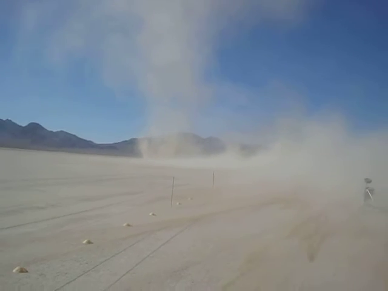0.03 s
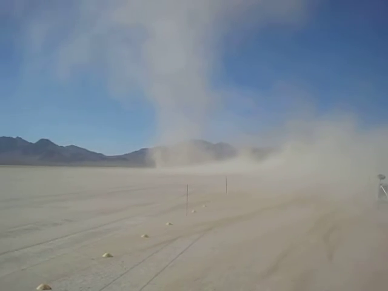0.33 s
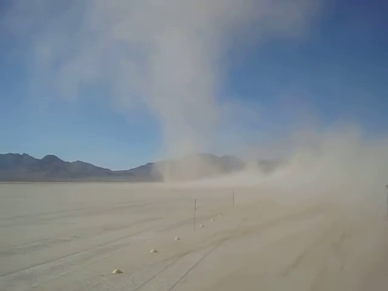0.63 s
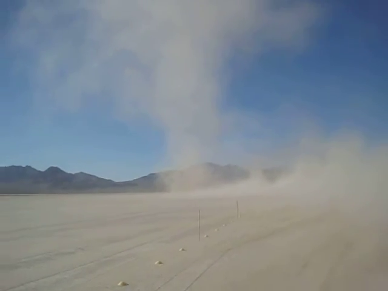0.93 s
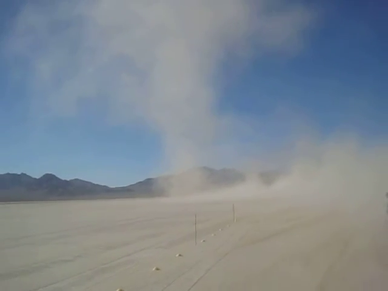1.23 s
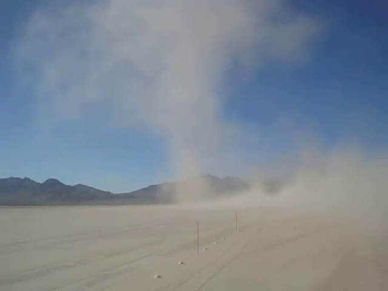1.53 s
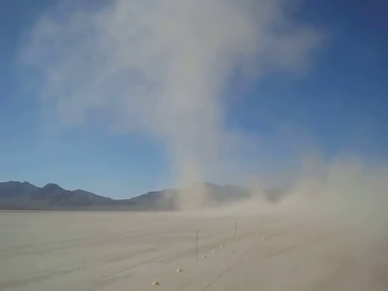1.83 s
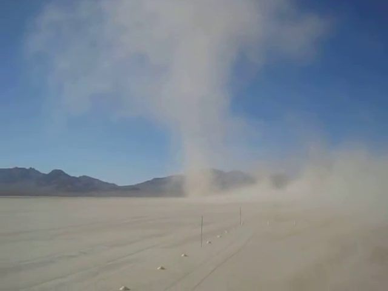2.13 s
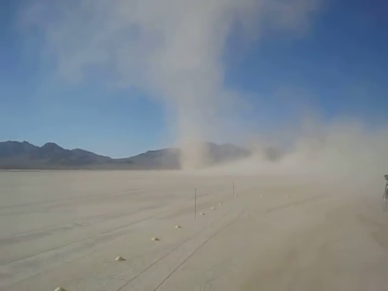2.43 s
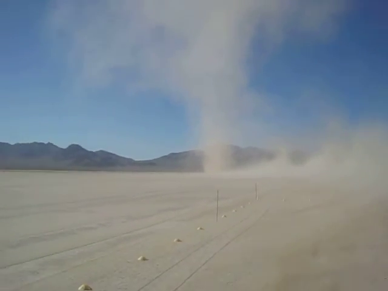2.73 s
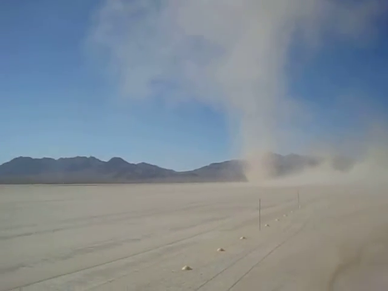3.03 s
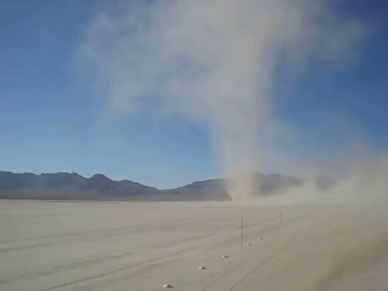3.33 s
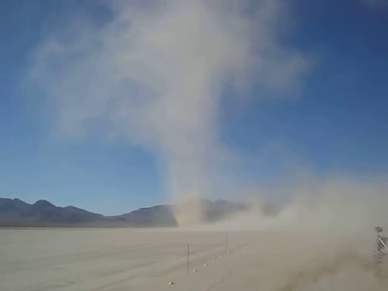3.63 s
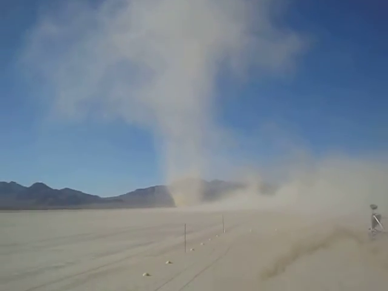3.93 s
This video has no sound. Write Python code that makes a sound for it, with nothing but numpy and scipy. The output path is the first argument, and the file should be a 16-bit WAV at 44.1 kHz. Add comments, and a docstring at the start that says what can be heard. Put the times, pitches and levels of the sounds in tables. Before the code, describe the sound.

Gusting wind buffets the microphone with rumbling thumps and a hiss of blown sand.

```python
"""A dry lake bed in gusting wind, a small bare microphone standing in the open as a dust devil passes.
Eddies flap and thump right on the diaphragm, over a roar and a rumble. Blown sand hisses across the
ground and peppers the microphone, swelling and then dying away. The hardest gusts make the diaphragm
crackle and pin it, choking the sound for milliseconds; in the lull a speck of grit ticks on the case."""
import sys
import numpy as np
from scipy import signal
from scipy.fft import rfft, irfft
from scipy.io import wavfile
from scipy.ndimage import uniform_filter1d

SR = 44100
rng = np.random.default_rng(int(sys.argv[2]) if len(sys.argv) > 2 else 0)


def store_pcm(level_fs):
    """Save levels as 16-bit WAV."""
    pcm = np.round(np.clip(level_fs, -1, 1) * 32767).astype(np.int16)
    wavfile.write(sys.argv[1], SR, np.atleast_2d(pcm).T)


N = 176400

# strength of the gusts, heard as the low rumble (t/s, relative level/dB)
GUST_LEVEL = [(0.0, -32.5), (0.4, -29), (0.71, -33), (1.05, -29.5), (1.4, -32.5), (2.25, -30.5),
              (2.54, -29.5), (2.8, -25.5), (3.21, -27.5), (3.38, -36.5), (3.55, -39), (4.0, -32.5)]
# strength of the turbulence at the microphone (t/s, relative level/dB)
TURBULENCE_LEVEL = [(0.08, -36), (0.3, -30.5), (0.7, -31), (1.05, -29.5), (1.35, -32), (1.6, -30),
                    (1.75, -27.5), (2.2, -28.5), (2.52, -32), (2.7, -23.5), (3.0, -28), (3.33, -34.5),
                    (3.43, -59), (3.52, -38.5), (3.62, -41), (4.0, -38)]
# strength of the blown sand (t/s, relative level/dB)
SAND_LEVEL = [(0.08, -57), (0.25, -54), (0.7, -53.5), (1.1, -52), (1.55, -51), (1.9, -48.5), (2.18, -50),
              (2.3, -46), (2.42, -51), (2.75, -48), (2.95, -52.5), (3.13, -64), (3.22, -59.5),
              (3.45, -74.5), (3.67, -72), (3.89, -60), (4.0, -74)]


def buffets(gain_db=-2.5, top_hz=2450, spiky=0.72, steep=2.26, rise=0.76, size=4096):
    """Eddies flap at the microphone in ragged, fast-rising bursts, each of its own length and pitch."""
    # passing eddies (centre t/s, width/s, relative level/dB, strongest f/Hz)
    eddies = [(0.014, 0.0066, -22.5, 352), (0.1502, 0.0062, -18, 290), (0.3523, 0.0061, -16, 500),
              (0.3683, 0.0072, -22, 675), (0.4515, 0.0052, -23.5, 302), (0.5325, 0.005, -15, 410),
              (0.578, 0.0019, -12.5, 356), (0.6163, 0.0073, -19.5, 420), (0.6892, .0019, -16, 252),
              (0.709, 0.0033, -20, 483), (0.7276, 0.0062, -20, 281), (0.8226, 0.0031, -14.5, 386),
              (0.8807, 0.0024, -17, 445), (0.931, 0.0058, -26.5, 500), (0.958, .0035, -24.5, 415),
              (0.9967, 0.00062, -17, 930), (1.02, 0.0072, -23, 550), (1.052, 0.0025, -17.5, 340),
              (1.082, 0.0068, -28, 528), (1.1537, 0.0023, -14.5, 760), (1.167, 0.012, -25, 640),
              (1.2167, 0.0031, -21, 410), (1.2842, 0.0018, -19, 317), (1.478, 0.0053, -16.5, 468),
              (1.4985, 0.0028, -11.5, 326), (1.6868, 0.0024, -20, 408), (2.2406, 0.0019, -18, 417),
              (2.301, 0.0013, -17, 477), (2.3295, 0.0085, -14.5, 380), (2.5114, 0.0028, -19, 348),
              (2.5746, 0.0062, -19, 452), (2.61, 0.0035, -20, 1110), (2.6679, 0.01, -26.5, 692),
              (2.6979, 0.0019, -19.5, 496), (2.7515, 0.0039, -17, 1130), (2.7948, 0.002, -14, 811),
              (2.838, 0.0045, -28, 750), (2.8622, 0.0011, -21.5, 800), (3.0392, 0.0017, -18, 475),
              (3.0659, 0.0021, -13.5, 410), (3.4, 0.0093, -33.5, 306), (3.5763, 0.0086, -24.5, 250),
              (3.5921, 0.0097, -31, 272), (3.7385, 0.007, -25, 237), (3.7857, 0.0032, -22.5, 285),
              (3.913, 0.0064, -23.5, 191), (3.9645, 0.0031, -19.5, 484)]
    out, t, hz = np.zeros(N), (np.arange(size) - size / 2) / SR, np.fft.rfftfreq(size, 1 / SR)
    for s, width, db, peak_hz in eddies:
        swirl, rag = rng.standard_normal((2, size))
        shape = np.exp(-(t / (width * np.where(t < 0, rise, 1))) ** 2 / 2)
        raggedness = np.exp(spiky * unit(uniform_filter1d(rag, size=40)))
        spectrum = rfft(swirl * raggedness * shape)
        spectrum /= np.sqrt(uniform_filter1d(abs(spectrum) ** 2, size=60))  # flatten before colouring
        u = hz / peak_hz
        colour = u / (1 + u ** 2 / (2 * steep - 1)) ** steep / np.sqrt(1 + (hz / top_hz) ** 8)
        burst = unit(irfft(spectrum * colour)) * np.sqrt(np.mean(shape ** 2))
        add(out, s + t[0], amp(db + gain_db) * burst)
    return out


def thumps(gain_db=-1, width_s=0.0095, wobble=0.277, size=4096):
    """Large eddies heave the diaphragm through a few uneven swings."""
    # large slow eddies (centre t/s, relative level/dB, f/Hz)
    eddies = [(0.158, -19.5, 143.4), (0.247, -18.5, 98.6), (0.484, -24, 90), (0.716, -18.5, 136.4),
              (0.961, -19, 123), (1.483, -22, 160.3), (1.74, -26, 148), (2.194, -16, 116),
              (2.666, -16.5, 96.3), (2.751, -29, 130), (2.791, -11, 172.4), (2.84, -18, 120.6),
              (2.894, -17.5, 111), (3.296, -19.5, 95)]
    out, t = np.zeros(N), (np.arange(size) - size / 2) / SR
    shape = np.exp(-(t / width_s) ** 2 / 2)
    for s, db, hz in eddies:
        drift = unit(uniform_filter1d(rng.standard_normal(size), size=200))
        turns = np.cumsum(hz * (1 + wobble * drift)) / SR + rng.random()
        add(out, s + t[0], amp(db + gain_db) * np.sqrt(2) * np.sin(2 * np.pi * turns) * shape)
    return out


def rumble(gain_db=3):
    """Slow pressure swings on the bare diaphragm."""
    # spectrum of the swings (f/Hz, relative level/dB)
    colour = [(12, -30), (25, -5), (55, 0), (110, -3.5), (170, -7.5), (300, -21), (700, -74), (5000, -110)]
    return amp(gain_db) * level(GUST_LEVEL) * noise(colour)


def roar(churn, gain_db=0.5, lumpy_db=2.5):
    """Mid-sized turbulence reaches the microphone in lumps."""
    # spectrum of the turbulence (f/Hz, relative level/dB)
    colour = [(40, -8.5), (130, -4.5), (290, -3), (500, -9.5), (800, -17.5), (1300, -25.5), (2200, -59.5),
              (5000, -77), (16000, -100)]
    return amp(gain_db) * level(TURBULENCE_LEVEL) * unit(noise(colour) * amp(lumpy_db * churn))


def snaps(churn, gust, gain_db=29.5, rise_s=0.00012, fall_s=0.0014, crackle_db=2, size=512):
    """Overload crackle: one-sided cusps of pressure, a few large, many faint where the air churns."""
    # the diaphragm snaps against its stop (t/s, relative peak level/dB)
    hard_snaps = [(0.3573, -39.5), (0.6434, -40), (0.667, -37.5), (0.7115, -34), (0.7311, -42),
                  (0.9548, -37), (1.0799, -46.5), (1.171, -39.5), (2.3297, -35.5), (2.6106, -45),
                  (2.712, -39), (2.7486, -34), (2.959, -41)]
    out, t = np.zeros(N), (np.arange(size) - size // 2) / SR
    cusp = uniform_filter1d(np.exp(-abs(t) / np.where(t < 0, rise_s, fall_s)), size=3)
    for s, db in hard_snaps:
        add(out, s + t[0], amp(db + gain_db) * rng.choice([-1, 1]) * cusp)
    crowd = np.exp(churn)
    hits = arrivals(per_s=130 * gust ** 2 * crowd / crowd.mean()) * rng.choice([-1, 1], N)
    sizes = amp(crackle_db) * random_sizes(spread_db=3.5) * level(TURBULENCE_LEVEL)
    return out + signal.oaconvolve(hits * sizes, cusp, "same")


def flutter(churn, gain_db=3, mean_per_s=140, low_hz=308, high_hz=920, bands=12, clump=0.7):
    """Small eddies, each a single push and pull of pressure, crowd in where the air churns."""
    # strength of the small eddies (t/s, relative level/dB)
    strength = [(0.0, -44.5), (1.12, -39.5), (1.28, -39.5), (2.56, -49), (2.73, -36), (2.84, -34),
                (3.25, -45), (3.36, -59), (3.59, -55), (3.75, -52), (4.0, -40.5)]
    out, t = np.zeros(N), np.arange(-256, 257) / SR
    crowd = np.exp(clump * churn)
    band_per_s = mean_per_s / bands * crowd / crowd.mean()
    for hz in np.geomspace(low_hz, high_hz, bands):
        sizes = random_sizes(spread_db=5) * rng.choice([-1, 1], N)
        u = 2 * np.pi * hz * t
        push_pull = u * np.exp(-u ** 2 / 2)
        out += signal.oaconvolve(sizes * arrivals(band_per_s), push_pull, "same")
    return amp(gain_db) * level(strength) * unit(out)


def sand(churn, gust, gain_db=8):
    """Sand streams over the ground; strong gusts chop its hiss into a fast flicker."""
    # spectrum of the streaming sand (f/Hz, relative level/dB)
    colour = [(200, 9.5), (1000, 7), (2000, 6.5), (2700, 3), (4200, 0.5), (5200, -7.5), (6300, -11.5),
              (7200, -17), (9000, -19), (12000, -26.5), (16000, -43)]
    flicker_db = 2.2 * gust * wander(rate_hz=520) + 0.45 * churn
    return amp(gain_db) * level(SAND_LEVEL) * noise(colour) * amp(flicker_db)


def spatter(gust, gain_db=-12, band_hz=(2950, 8400)):
    """Fine grains of sand pepper the microphone, thicker and harder in strong gusts."""
    hits = random_sizes(spread_db=3) * arrivals(per_s=900 * gust)
    grains = signal.oaconvolve(hits, np.hanning(32), "same") * rng.standard_normal(N)
    band = signal.butter(1, band_hz, "bandpass", fs=SR, output="sos")
    patter = unit(signal.sosfilt(np.vstack([band, band]), grains))
    return amp(gain_db) * level(SAND_LEVEL) * gust * patter


def grit(scratch=0.37, scratch_s=0.00064):
    """A speck grazes the microphone's case, then hits it squarely and rings it very briefly."""
    # strikes on the case (t/s, relative level/dB, low-pass f/Hz)
    strikes = [(3.3675, -30.5, 3300), (3.3706, -26, 11000)]
    # modes of the case (f/Hz, relative level/dB, t60/s)
    modes = [(1090, 3, 0.0059), (2730, 1, 0.004), (3180, 2.5, 0.0072), (4700, 1, 0.0042),
             (5560, -4, 0.0059), (8500, -3, 0.0033), (12100, -14.5, .003)]
    out, t = np.zeros(N), np.arange(1024) / SR
    ring = sum(amp(db - 60 * t / t60) * np.sin(2 * np.pi * hz * t) for hz, db, t60 in modes)
    for s, db, top_hz in strikes:
        scrape = rng.standard_normal(len(t)) * np.exp(-t / scratch_s)
        tick = signal.lfilter(*signal.butter(2, top_hz, fs=SR), ring / 2 + scratch * scrape)
        add(out, s, amp(db) * tick)
    return out


def still_air(level_db=-63.5):
    """A faint steady hiss lies behind the wind."""
    # spectrum of the background (f/Hz, relative level/dB)
    colour = [(300, 0), (1200, 17.5), (2600, 8), (6000, 2.5), (9000, -0.5), (16000, -6)]
    return amp(level_db) * noise(colour)


def amp(db):
    """Decibels to gain."""
    return 10 ** (np.asarray(db) / 20)


def unit(x):
    """Scales to rms 1."""
    return x / np.sqrt(np.mean(x ** 2) + 1e-20)


def level(curve):
    """A (t/s, level/dB) curve as a gain for every sample."""
    return amp(np.interp(np.arange(N) / SR, *np.transpose(curve)))


def add(mix, s, sound):
    """Mixes a sound in from time s."""
    at = round(s * SR)
    sound = sound[max(-at, 0):]
    part = mix[max(at, 0):][:len(sound)]
    part += sound[:len(part)]


def noise(spectrum):
    """Noise of rms 1 with the given (f/Hz, level/dB) colour."""
    hz, db = np.transpose(spectrum)
    gain = amp(np.interp(np.log(np.fft.rfftfreq(N, 1 / SR) + 1), np.log(hz), db))
    return unit(irfft(rfft(rng.standard_normal(N)) * gain, N))


def wander(rate_hz):
    """Random drift of rms 1, up to about the given rate."""
    hz = np.fft.rfftfreq(N, 1 / SR)
    band = hz / (hz + rate_hz / 10) * np.exp(-(hz / rate_hz) ** 2)
    return unit(irfft(rfft(rng.standard_normal(N)) * band, N))


def arrivals(per_s):
    """Randomly timed impulses at the given rate."""
    return rng.random(N) < per_s / SR


def random_sizes(spread_db):
    """A gain for every sample: most near 1, a few up to three spreads louder."""
    return amp(spread_db * np.minimum(rng.exponential(1, N), 3))


def scene():
    """All the air and sand that reach the one microphone."""
    churn = wander(rate_hz=46)
    gust = level(GUST_LEVEL) / level(GUST_LEVEL).max()
    wind = rumble() + roar(churn) + flutter(churn) + buffets() + thumps() + snaps(churn, gust)
    return (wind + sand(churn, gust) + still_air() + spatter(gust) + grit())[None]


def record(dry, settle_s=0.00068, cutoff_hz=16274):
    """While the diaphragm is pinned its output settles to zero; a low-pass then trims the top treble."""
    # moments when the diaphragm is pinned (start t/s, length/s)
    stalls = [(0.469, 0.0077), (0.6433, 0.0056), (0.652, 0.0064), (0.671, 0.015), (0.9647, 0.0032),
              (2.675, 0.0059), (2.686, 0.0049), (2.7273, 0.0016), (2.7809, 0.0051), (2.7901, 0.0043),
              (2.7964, 0.0089), (2.8433, 0.0033), (2.9086, 0.0033), (2.9948, 0.0046), (3.007, 0.0023),
              (3.035, 0.0045), (3.0624, 0.0047)]
    t, free = np.arange(N) / SR, np.ones(N)
    for start, length in stalls:
        free[(t >= start) & (t < start + length)] = 0
    decay = np.exp(-1 / (settle_s * SR))
    motion = signal.lfilter([1, -decay], [1], dry) * free
    choked = signal.lfilter([1], [1, -decay], motion)  # the two filters cancel while it moves freely
    low_pass = signal.firwin(511, cutoff_hz, window=("kaiser", 9), fs=SR)
    return signal.oaconvolve(choked, low_pass[None], "same")


dry = scene()
out = record(dry)
store_pcm(out)
```